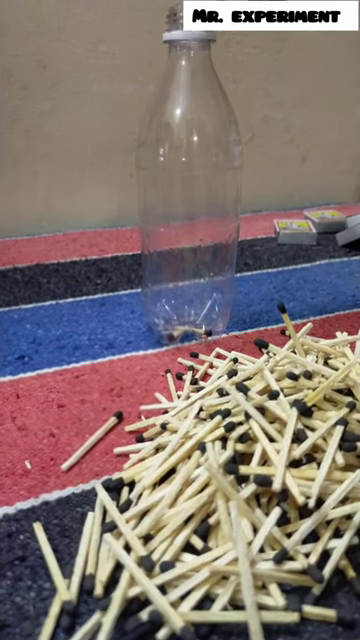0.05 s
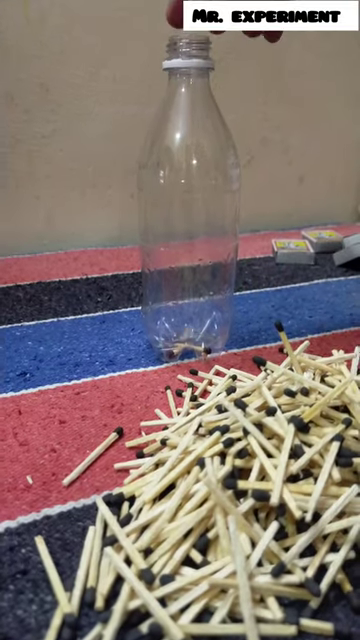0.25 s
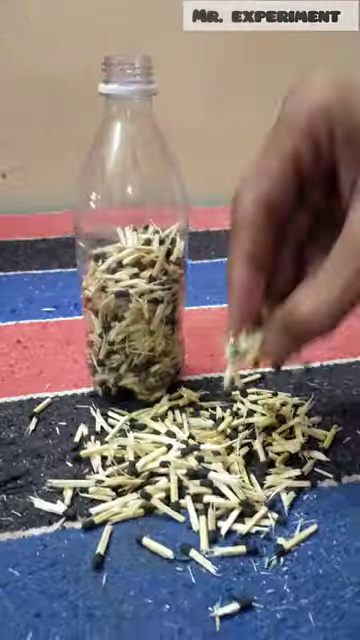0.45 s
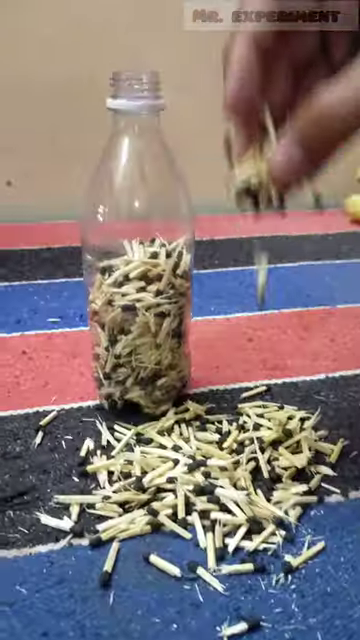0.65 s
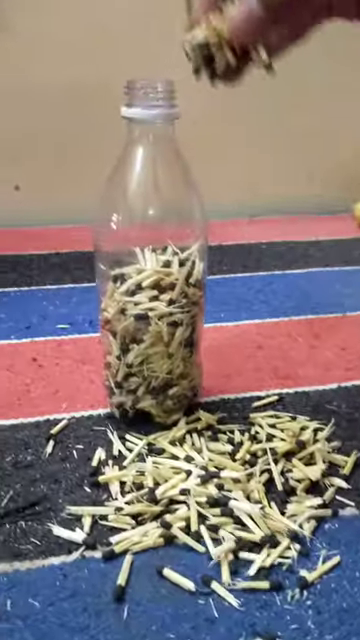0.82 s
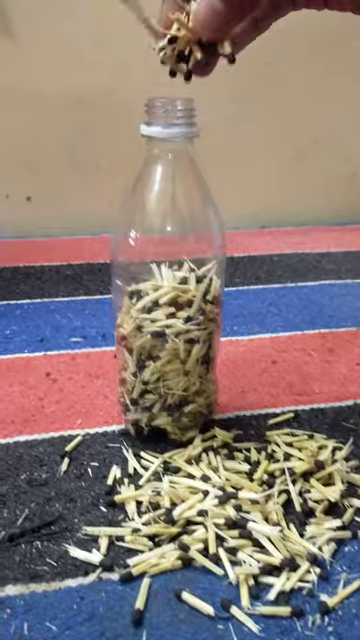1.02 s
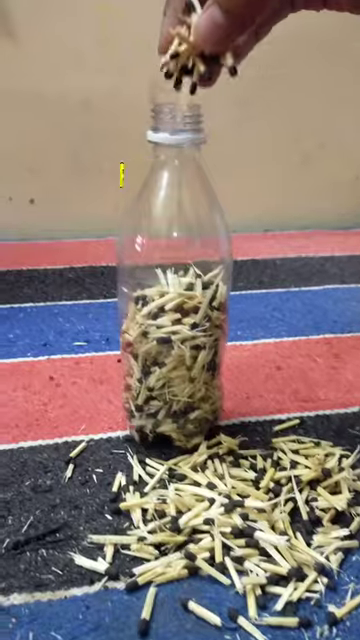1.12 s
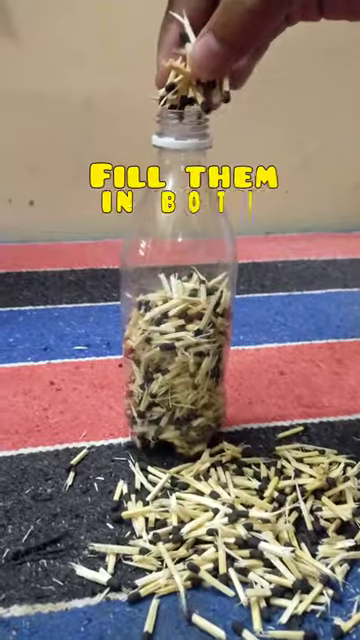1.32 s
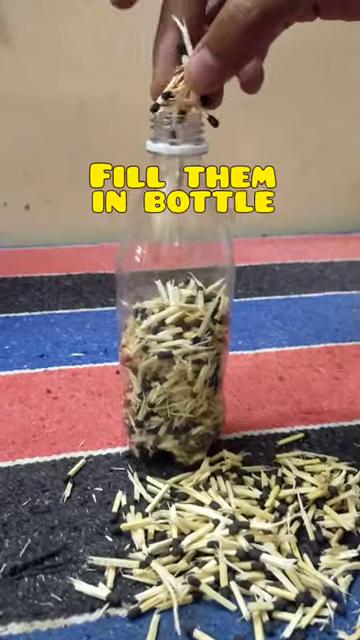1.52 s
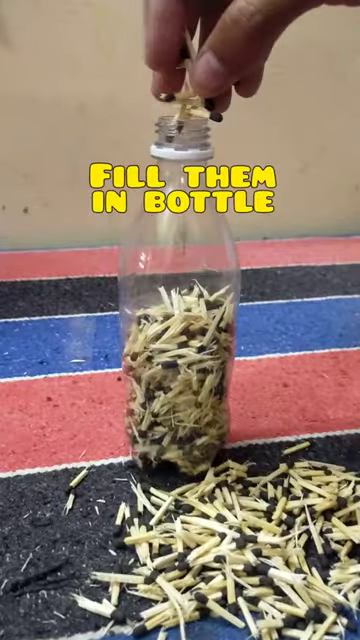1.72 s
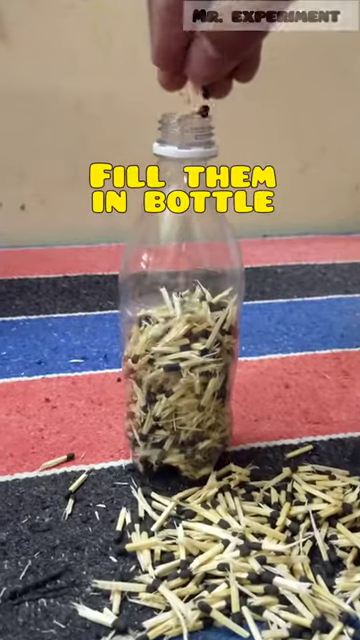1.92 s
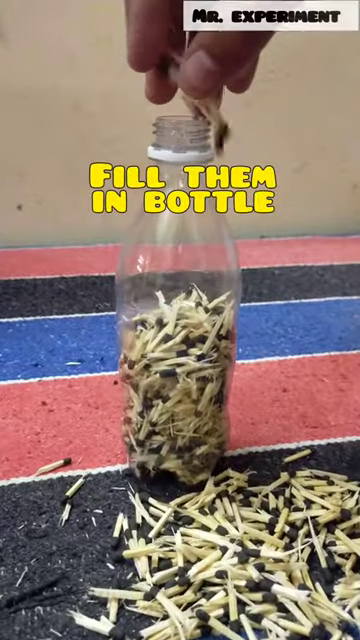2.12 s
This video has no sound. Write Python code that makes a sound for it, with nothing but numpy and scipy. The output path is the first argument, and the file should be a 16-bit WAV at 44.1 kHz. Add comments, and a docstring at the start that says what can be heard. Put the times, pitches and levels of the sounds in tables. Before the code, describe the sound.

Small wooden sticks hit the bottom of a plastic bottle, cracking hollowly three times. The sound cuts out, then faint dry clicks and rubbing follow as more are fed through the neck, with low bumps in a quiet, humming room.

```python
"""Matchsticks dropped into a plastic bottle in a small, quiet room. Three hit the base of the nearly
empty bottle: a crack, a hollow thud, a faint ring of the air inside. The sound breaks off and fades
back in: fingers work a bunch of broken sticks into the neck, where they rub and tick against each
other and onto the pile. The hand bumps the bottle, over a soft room hum."""
import sys
import numpy as np
from scipy import signal
from scipy.fft import rfft, irfft, next_fast_len
from scipy.io import wavfile
from scipy.ndimage import map_coordinates

SR = 44100
rng = np.random.default_rng(int(sys.argv[2]) if len(sys.argv) > 2 else 0)


def bounce(signal):
    """Save signal as a 16-bit WAV file at the path given by the first command-line argument."""
    frames = np.transpose(np.atleast_2d(signal))
    limited = np.clip(frames, -1, 1)
    pcm = np.round(limited * 32767).astype(np.int16)
    wavfile.write(sys.argv[1], SR, pcm)


N = 94815
BREAK_S, RESUME_S = 0.46, 0.579  # silent between


def knocks():
    """A stick grazes the base, strikes it with a crack and a hollow ring, then its other end lands."""
    # strikes: start_s, thud_db, crack_db
    strikes = [(0.2375, -26, -27), (0.2842, -16.5, -25.5), (.399, -31.5, -38)]
    # base modes: pitch_hz, level_db, t60_s
    base_modes = [(1293, -4.5, 0.045), (1707, 0, 0.017), (2072, -5, 0.014), (2472, -8.5, 0.014),
                  (2625, -1.5, 0.025), (2780, -7, 0.014), (3240, -11, .014), (3580, -15, 0.012),
                  (4130, -19.5, 0.018)]
    # bottle air modes: pitch_hz, level_db (re thud), t60_s
    air_modes = [(1297, -27.5, 0.24), (2662, -28, 0.38), (3315, -33, 0.42), (3530, -21, 0.27),
                 (3790, -35.5, 0.24)]
    # crack spectrum: freq_hz, level_db
    crack_spectrum = [(300, -22), (1000, -8.5), (3500, 9.5), (4900, -12.5), (6100, 0.5), (7000, -1.5),
                      (7700, 5.5), (9400, -6.5), (10600, -0.5), (11700, -4.5), (13300, 2.5), (14400, -4.5),
                      (15100, 0.5)]
    lead_s, graze_db = 0.001095, -7.5
    flex_s, crack_t60_s, wander_rad = 0.0019, 0.022, 1.4
    settle_s, settle_db = 0.0115, -14.5
    out, t = np.zeros(N), np.arange(SR // 4) / SR - lead_s
    for start_s, thud_db, crack_db in strikes:
        swell = np.clip((t + lead_s) / (flex_s + lead_s), 0, 1) ** 2  # the base gives
        ring = sum((-1) ** k * amp(db) * decay(np.maximum(t - flex_s, 0), t60_s)
                   * np.sin(2 * np.pi * hz * t) for k, (hz, db, t60_s) in enumerate(base_modes))
        air = sum(amp(db) * decay(t, t60_s)
                  * np.sin(2 * np.pi * hz * t + wander_rad * wobble(130)[:len(t)])
                  for hz, db, t60_s in air_modes)
        thud = amp(thud_db - 2) * (burst(ring * swell) + air)
        graze = amp(graze_db) * (t < 0)
        settle = amp(settle_db) * decay(t - settle_s, t60_s=0.11)
        contact = graze + decay(t, crack_t60_s) + settle
        crack = amp(crack_db) * burst(contact * noise(crack_spectrum, len(t)))
        add(out, start_s - lead_s, in_room(thud + crack, wet_db=-11))
    return out


def ticks():
    """Sticks touch in the neck and on the pile: a dry click, then brief chatter, in three bands."""
    # contacts: start_s, pitch_hz, body_db, snap_db, top_db
    contacts = [(0.6234, 2600, -74.5, -75, -67), (0.647, 2900, -64, -71.5, -89),
                (0.7104, 2600, -63, -71.5, -87), (0.8308, 2550, -62, -63.5, -66),
                (1.1633, 3500, -56, -65.5, -70), (1.2652, 2300, -48.5, -55.5, -54),
                (1.2992, 2900, -62, -66, -87), (1.3268, 3800, -53, -42.5, -42.5),
                (1.3819, 3200, -57, -65.5, -83), (1.424, 2910, -67, -64.5, -89),
                (1.4847, 3350, -55, -72, -67), (1.5077, 2800, -50, -52, -60), (1.5231, 2940, -56, -58, -72),
                (1.5345, 3450, -49, -47, -65), (1.5632, 2740, -64, -75, -85),
                (1.5871, 2900, -43, -43, -50.5), (1.6242, 3170, -56, -63, -71),
                (1.6482, 2600, -53.5, -62, -63), (1.6635, 3080, -61, -68, -86),
                (1.6922, 2600, -52, -73, -60), (1.7078, 2530, -40, -48.5, -46.5),
                (1.7147, 2700, -63, -63, -50), (1.7819, 3130, -49.5, -53.5, -50.5),
                (1.8459, 2200, -61, -66, -61), (1.8508, 2870, -46.5, -68, -84),
                (1.8524, 2820, -47.5, -69, -86), (1.8756, 3220, -39, -38.5, -49),
                (1.894, 3350, -48, -56, -68), (1.9007, 2780, -55, -70, -85), (1.9102, 3000, -48, -57, -75),
                (1.915, 2880, -59, -62, -83), (1.9183, 2930, -51, -68, -78), (1.9293, 3200, -62, -58, -68),
                (1.967, 3500, -51.5, -45.5, -54), (1.9886, 3500, -61, -58, -63),
                (1.9976, 3000, -65, -59, -56), (2.01, 2500, -61, -57.5, -73),
                (2.0388, 3070, -48.5, -56, -48.5), (2.0435, 2940, -57, -64, -55)]
    # stick body resonances: pitch_ratio, width_hz, level_db
    body_modes = [(.71, 420, 0), (.96, 480, -2), (1.14, 420, -1)]
    # snap resonances: centre_hz, width_hz, level_db
    snap = [(6850, 1000, -19), (8330, 1200, 0), (8800, 570, -2)]
    # top resonances: centre_hz, width_hz, level_db
    top = [(12300, 1800, -8.5), (13400, 920, 0), (15300, 370, 4.5)]
    # tails of body, snap, top: chatter_gain, t60_s, room_db
    tails = [(0.69, 0.014, -15), (0.4, 0.0089, -18.5), (1, 0.02, -11)]
    trim_db, chatter_delay_s = -2.5, 0.0004
    out, t = np.zeros(N), np.arange(SR // 30) / SR
    for start_s, pitch_hz, *levels_db in contacts:
        body = [(ratio * pitch_hz, width_hz, db) for ratio, width_hz, db in body_modes]
        for band, (chatter_gain, t60_s, room_db), db in zip((body, snap, top), tails, levels_db):
            click = stick_click(band, len(t))
            rattle = rng.standard_normal(len(t)) * decay(t - chatter_delay_s, t60_s)
            chatter = signal.fftconvolve(click, rattle)[:len(t)]
            tick = burst(burst(click) + chatter_gain * burst(chatter))
            add(out, start_s, in_room(amp(db + trim_db) * tick, room_db))
    return out


def stick_click(resonances, size, detune=0.02):
    """One sharp contact through broad resonances, slightly different for each stick."""
    hz = np.fft.rfftfreq(size, 1 / SR)
    power = np.zeros(len(hz))
    for centre_hz, width_hz, db in resonances:
        centre_hz = centre_hz * np.exp(rng.normal(0, detune))
        band = 2 * hz * width_hz / np.hypot(centre_hz ** 2 - hz ** 2, 2 * hz * width_hz)
        power += (amp(db) * band ** 2) ** 2
    # minimum phase: energy at the onset
    cepstrum = irfft(np.log(power + 1e-6) / 2, size)
    cepstrum[1:size // 2] *= 2
    cepstrum[size // 2 + 1:] = 0
    return irfft(np.exp(rfft(cepstrum)), size)


def rustle():
    """Tiny slips between the sticks pinched in the fingers."""
    # rubbing envelope: time_s, level_db
    rubbing = [(.6, -100), (.85, -80), (1.2, -86), (1.42, -79), (1.49, -64), (1.56, -98), (1.66, -70.5),
               (1.76, -74), (1.91, -87), (2.0, -81), (2.15, -74)]
    # slip spectrum: freq_hz, level_db
    spectrum = [(800, 1), (2500, 4), (5000, -25), (8500, 9.5), (11500, -14), (15000, 4)]
    slips_per_s, scatter_db = 2200, 3
    slips = (rng.random(N) < slips_per_s / SR) * rng.standard_normal(N)
    slips *= amp(scatter_db * rng.standard_normal(N))
    grains = filtered(slips, lambda hz: amp(log_interp(spectrum, hz)))
    return envelope(rubbing) * unit_rms(in_room(grains, wet_db=-16)[:N])


def hand_bumps():
    """The hand nudges the bottle: low, quickly damped bumps over a faint rumble."""
    # bumps: start_s, level_db, pitch_hz
    bumps = [(0.649, -55.5, 109), (0.71, -43, 83), (1.302, -46, 32), (1.36, -46, 30), (1.694, -38.5, 36),
             (1.805, -40.5, 42), (1.876, -35, 35.5)]
    # rumble envelope: time_s, level_db
    rumble = [(.58, -78), (1.2, -70.5), (1.35, -59.5), (1.7, -60.5), (2.15, -71)]
    # rumble spectrum: freq_hz, level_db
    spectrum = [(15, -13), (30, 0.5), (70, -18), (130, -8.5), (250, -69), (600, -83)]
    rise_s, t60_cycles = 0.0022, 3.5
    out, t = np.zeros(N), np.arange(SR // 4) / SR
    attack = 1 - np.exp(-t / rise_s)
    for start_s, db, hz in bumps:
        add(out, start_s, amp(db) * np.sin(2 * np.pi * hz * t) * decay(t, t60_cycles / hz) * attack)
    return out + envelope(rumble) * noise(spectrum, N)


def room_air():
    """Steady, soft air noise."""
    # air spectrum: freq_hz, level_db
    spectrum = [(24, -43), (40, -4.5), (69, -17.5), (87, -11), (166, -6.5), (266, -10), (309, -8.5),
                (397, -11), (438, -7), (535, -15.5), (686, -9.5), (797, -10), (1380, -1), (1600, -8.5),
                (2510, -9), (5050, -35.5), (15500, -45)]
    return amp(-46) * noise(spectrum, N)


def room_hum():
    """A wavering hum in soft air noise, fading in."""
    # hum tones: pitch_hz, level_db (re air noise)
    tones = [(172.3, -13.5), (224, -17), (291, -14), (405, -20.5), (506, -17), (706, -22.5), (823, -27),
             (1190, -15)]
    # air spectrum: freq_hz, level_db
    spectrum = [(59, -3), (100, -10.5), (173, 0.5), (238, -4.5), (306, -2), (370, -7), (447, -7),
                (508, -8.5), (564, -11), (712, -3), (917, -5), (977, -7.5), (1180, -3.5), (1400, -8),
                (1920, -8), (2090, -8), (4750, -30.5), (6120, -37.5), (8060, -37), (11100, -39.5),
                (15500, -37)]
    # fade-in: time_s, level_db
    fade = [(.58, -71), (.66, -64), (.77, -60), (.88, -58), (1.06, -56.5), (1.27, -55), (1.5, -54),
            (1.83, -54), (2.15, -53)]
    wander_rad = 0.89
    t = np.arange(N) / SR
    hum = sum(amp(db) * np.sqrt(2) * np.sin(2 * np.pi * hz * t + wander_rad * wobble(9.16))
              for hz, db in tones)
    return envelope(fade) * (noise(spectrum, N) + hum)


def in_room(x, wet_db, build_s=0.0091):
    """Direct sound plus a fresh tail of decaying noise."""
    # room decay: freq_hz, t60_s
    room_decay = [(200, .35), (1300, 0.12), (3000, 0.25), (7000, .25), (15000, 0.14)]
    hz, t, bins = signal.stft(rng.standard_normal(SR // 4), SR, nperseg=256)
    bins *= decay(t, log_interp(room_decay, hz)[:, None])
    impulse = signal.istft(bins, SR, nperseg=256)[1]
    impulse *= np.minimum(np.arange(len(impulse)) / SR / build_s, 1) ** 2
    impulse *= amp(wet_db) / np.linalg.norm(impulse)
    impulse[0] += 1  # direct path
    return signal.fftconvolve(x, impulse)


def amp(db):
    """Decibels to gain."""
    return 10 ** (np.asarray(db) / 20)


def unit_rms(x):
    """Scale to rms 1."""
    return x / np.sqrt(np.mean(x ** 2) + 1e-20)


def burst(x):
    """Scale to the energy of 3 ms at rms 1."""
    return x / np.sqrt(np.sum(x ** 2) / (0.003 * SR) + 1e-20)


def log_interp(points, hz):
    """Interpolate (freq_hz, value) points on a log axis."""
    freq_hz, values = np.transpose(points)
    return np.interp(np.log(hz + 1), np.log(freq_hz + 1), values)


def envelope(points):
    """Gain per sample from (time_s, level_db) points."""
    return amp(np.interp(np.arange(N) / SR, *np.transpose(points)))


def filtered(x, response):
    """Zero-phase filter of gain response(hz)."""
    size = next_fast_len(len(x) + 8192)
    return irfft(rfft(x, size) * response(np.fft.rfftfreq(size, 1 / SR)), size)[:len(x)]


def noise(spectrum, size):
    """Coloured noise of rms 1."""
    return unit_rms(filtered(rng.standard_normal(size), lambda hz: amp(log_interp(spectrum, hz))))


def wobble(knots_per_s):
    """Smooth random curve."""
    knots = rng.standard_normal(int(N * knots_per_s / SR) + 4)
    return map_coordinates(knots, [np.arange(N) * knots_per_s / SR])


def decay(t, t60_s):
    """Exponential decay from t = 0, silent before."""
    return (t >= 0) * np.exp(-np.log(1000) * np.abs(t) / t60_s)


def add(track, start_s, x):
    """Mix x into the track."""
    part = track[round(start_s * SR):][:len(x)]
    part += x[:len(part)]


def scene():
    """Knocks in the nearly empty bottle, a short silence, then the filling; mono."""
    fade_s = 0.0065
    t = np.arange(N) / SR
    empty = knocks() + room_air()
    filling = ticks() + rustle() + hand_bumps() + room_hum()
    fade_in = np.clip((t - RESUME_S) / fade_s, 0, 1)
    return (empty * (t < BREAK_S) + filling * fade_in)[None]


def record(dry):
    """A DC offset swings negative after the silence and creeps back; steep low-pass."""
    offset_gain, rise_s, fall_s, cutoff_hz = -0.04, 0.1, 0.91, 15550
    since_s = np.maximum(np.arange(N) / SR - RESUME_S, 0)
    rise = 1 - np.exp(-(since_s / rise_s) ** 1.43)
    offset = offset_gain * rise * np.exp(-(since_s / fall_s) ** 2)
    return filtered(dry[0] + offset, lambda hz: 1 / (1 + (hz / cutoff_hz) ** 200))[None]


dry = scene()
out = record(dry)
bounce(out)
```